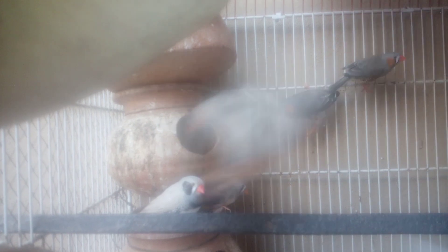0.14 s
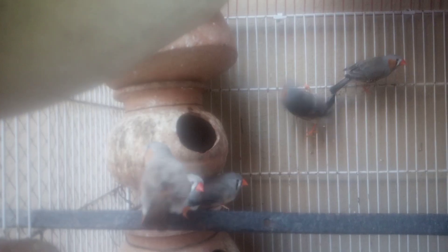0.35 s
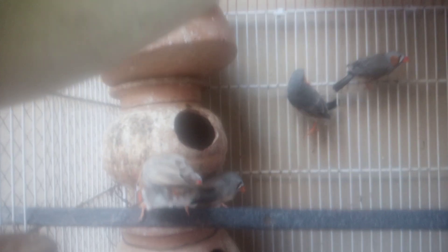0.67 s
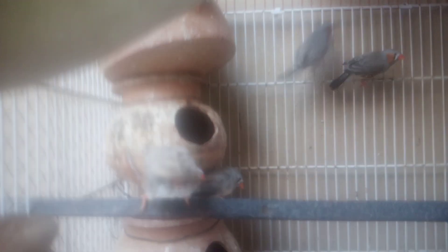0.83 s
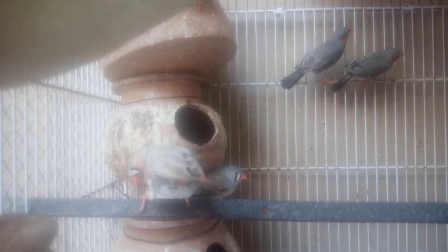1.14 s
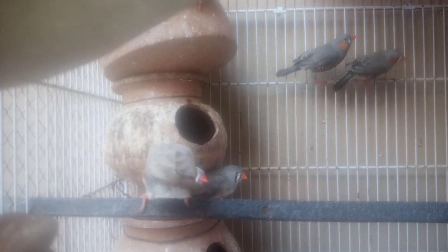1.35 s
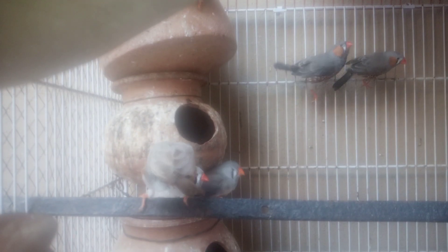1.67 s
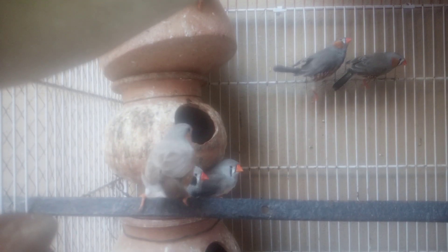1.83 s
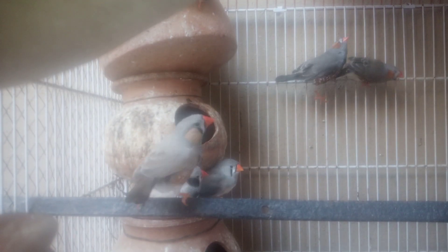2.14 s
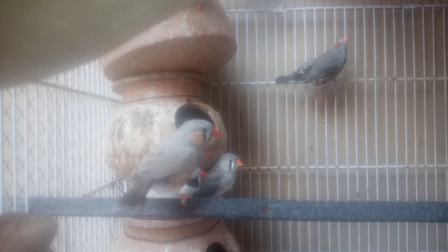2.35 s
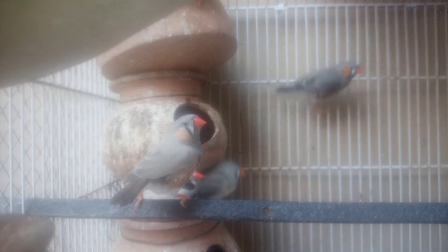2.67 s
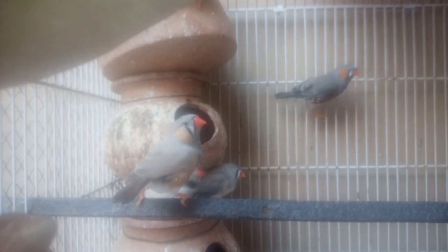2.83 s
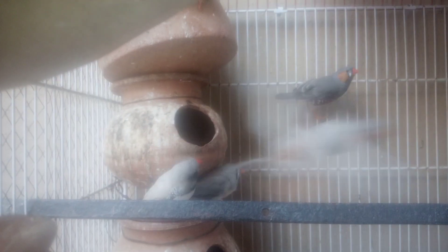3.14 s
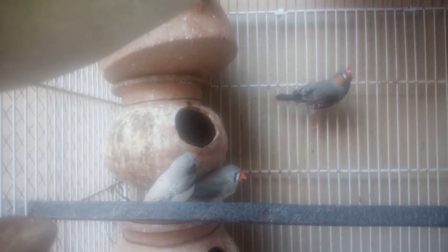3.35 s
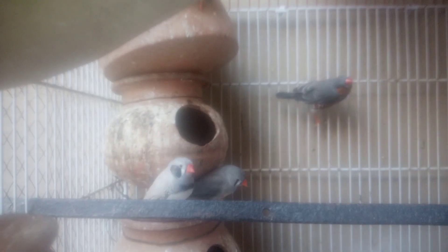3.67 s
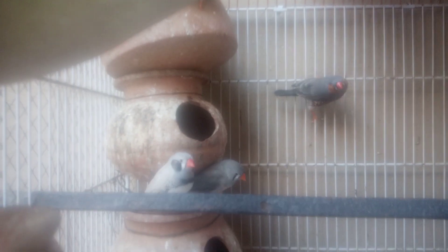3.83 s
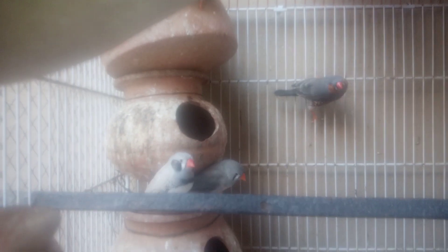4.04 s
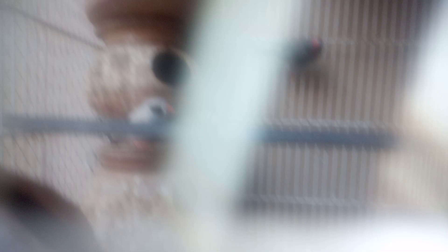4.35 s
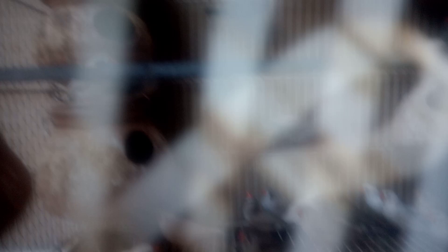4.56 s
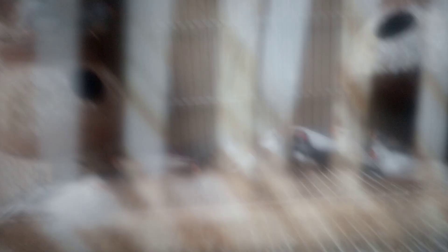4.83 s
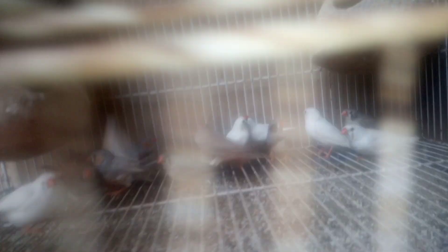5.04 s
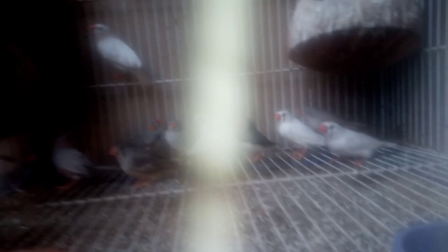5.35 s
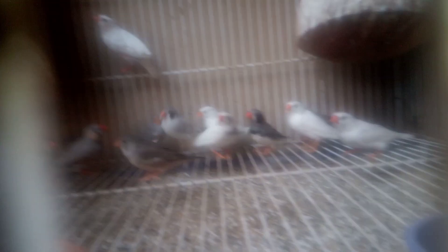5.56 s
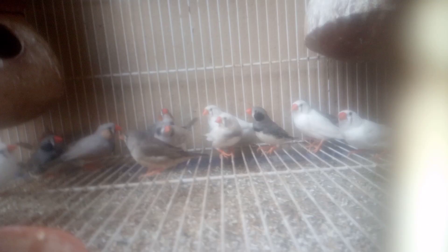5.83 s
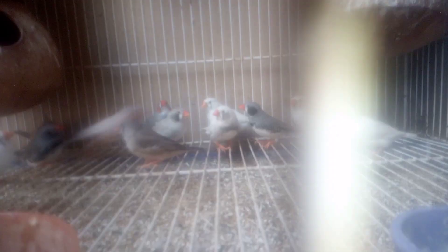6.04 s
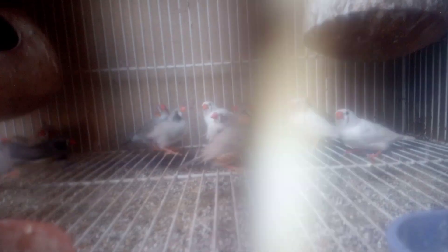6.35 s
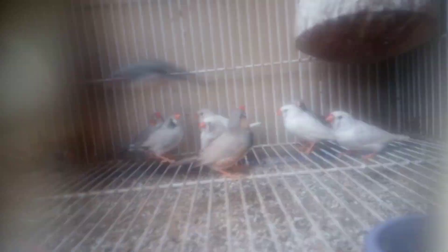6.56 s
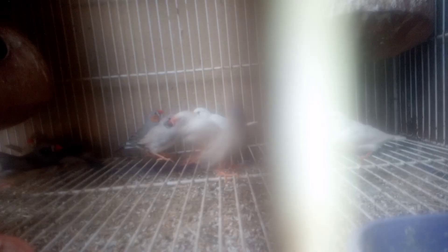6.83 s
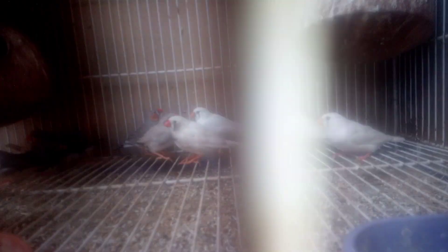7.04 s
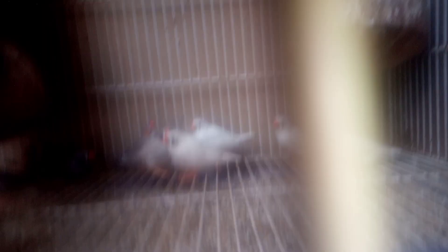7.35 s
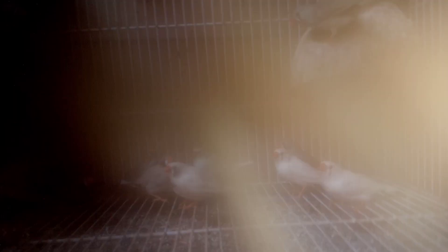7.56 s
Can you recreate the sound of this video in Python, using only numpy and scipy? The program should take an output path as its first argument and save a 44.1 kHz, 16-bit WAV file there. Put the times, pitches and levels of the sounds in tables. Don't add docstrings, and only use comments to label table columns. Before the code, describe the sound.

Overlapping small-bird calls fill a reverberant cage: rough buzzing chirps, quick near-pure whistles sliding up or down, and short toy-like nasal beeps. The densest, loudest clusters come in the first half second and around three and a half seconds; later calls are sparser. Faint metallic ticks, soft feather hiss, far birds and low rumble sit underneath, heard through a muffled phone microphone with air stirring as it moves nearer.

```python
import sys
import numpy as np
from scipy import signal
from scipy.fft import rfft, irfft
from scipy.io import wavfile

SR = 44100
rng = np.random.default_rng(int(sys.argv[2]) if len(sys.argv) > 2 else 0)


def file_out(sig):
    cols = np.atleast_2d(sig).T
    lim = np.clip(cols, -1, 1)
    pcm = np.round(lim * 32767).astype(np.int16)
    wavfile.write(sys.argv[1], SR, pcm)


def magnitude_from_level(level_db):
    exponent = np.asarray(level_db, float) / 20
    return 10 ** exponent


N = 339129


def rms_one(x):
    return x / np.sqrt(np.mean(np.abs(x) ** 2) + 1e-20)


def place(out, at, sound):
    out[at:at + len(sound)] += sound


def soft_ends(size, fade_s):
    i = np.arange(size)
    nearest_end = np.minimum(i, size - i)
    return np.sin(np.pi / 2 * np.clip(nearest_end / (fade_s * SR), 0, 1)) ** 2


def wobble(size, hz, count=1):
    r = np.exp(-16 * np.pi * hz / SR)
    white = rng.standard_normal((2, count, size // 8 + 202))
    slow = signal.lfilter([1], [1, -2 * r, r * r], white)[..., 200:]
    slow = slow / np.sqrt(2 * np.mean(slow ** 2, axis=(0, 2), keepdims=True))
    step, part = np.divmod(np.arange(size) / 8, 1)
    step = step.astype(int)
    real, imaginary = slow[..., step] * (1 - part) + slow[..., step + 1] * part
    return real + 1j * imaginary


def coloured(spectrum, low_hz=10, high_hz=20000):
    hz = np.arange(1, N // 2 + 2) * SR / N
    f, level_db = np.transpose(spectrum)
    gain = magnitude_from_level(np.interp(np.log(hz), np.log(f), level_db, -120, -120))
    inside = (hz > low_hz) * (hz < high_hz)
    return rms_one(irfft(rfft(rng.standard_normal(N)) * gain * inside, N))


def voice(pitch, throat, spread, rough, blur_hz, leak_db, jitter, uneven_db, order=2, count=50):
    size = len(pitch)
    phase = 2 * np.pi * np.cumsum(pitch * (1 + jitter * wobble(size, 44.4)[0].real)) / SR
    lines = min(count, int(15000 / pitch.max()))
    k = np.arange(1, lines + 1)[:, None]
    octaves = np.log2(k * pitch / throat)
    gain = np.exp(-.5 * (octaves / spread) ** order) + magnitude_from_level(leak_db)
    gain = gain * magnitude_from_level(uneven_db * wobble(size, 3.9, lines).real)
    clean = np.sqrt(1 - np.clip(rough, 0, 1) ** 2)
    blur = clean + rough * wobble(size, blur_hz, lines)
    waves = blur.real * np.cos(k * phase) - blur.imag * np.sin(k * phase)
    return rms_one(np.sum(gain * waves, axis=0))


def effort(s, length, peak_db, peak, start_db, end_db):
    at = max(int(s * SR), 0)
    progress = np.arange(min(int(length * SR), N - at)) / (length * SR)
    shape_db = np.interp(progress, [0, np.clip(peak, .01, .99), 1], [start_db, 0, end_db])
    return at, progress, peak_db + shape_db


def along(curve):
    s, pitch_hz, level_db = np.transpose(curve)
    t = np.arange(int(s[0] * SR), int(s[-1] * SR)) / SR
    pitch = np.exp(np.interp(t, s, np.log(pitch_hz)))
    return int(s[0] * SR), pitch, np.interp(t, s, level_db)


def chirps():
    # [t/s, length/s, peak level/dB, throat resonance f/Hz, second-voice pitch f/Hz]
    swelling = [(.04, 0.075, -10.5, 4700, 2636), (.56, 0.095, -14, 4810, 2400), (.185, .13, -13, 4600, 700),
                (3.335, 0.11, -22, 4200, 950), (2.708, 0.1, -14, 4750, 746), (3.43, .15, -15, 4483, 975),
                (3.64, 0.062, -16.5, 4126, 2350), (3.97, 0.14, -19, 4650, 652),
                (5.05, .14, -14.5, 4570, 502.5), (6.26, .035, -29.5, 6750, 1315),
                (6.435, 0.125, -19.5, 4500, 640), (5.7, .1, -17.5, 3615, 696),
                (6.96, .12, -15.5, 4613, 772)]
    held = [(.147, 0.045, -15, 4300, 1056), (.985, 0.08, -22, 4800, 1030), (1.132, 0.07, -24, 4900, 1040),
            (1.55, 0.067, -22, 4560, 2403), (4.725, 0.075, -26, 4100, 1030), (4.87, 0.075, -23, 4080, 795)]
    fading = [(0.0, 0.044, -16, 4760, 1480), (1.63, 0.039, -24, 4240, 2970), (1.95, 0.09, -39, 3800, 1286),
              (2.912, .19, -15.5, 4343, 1100), (3.85, 0.09, -16, 4200, 770)]
    narrow = [(1.35, .15, -14, 4750, 203.4), (2.105, 0.16, -12, 4554, 492), (5.46, .2, -12.5, 4586, 467),
              (5.7, 0.089, -17, 4430, 370), (3.315, .08, -23, 5300, 480), (5.385, .09, -27, 4200, 480),
              (7.615, .075, -31.5, 4610, 486)]
    building = [(3.74, .12, -15, 4200, 491), (5.95, .225, -18, 4490, 866)]
    # (calls, peak at share of length, start dB, end dB, throat glide octaves, throat width octaves,
    # second voice dB)
    kinds = [(swelling, .41, -9.5, -11.5, .03, .37, -9),
             (held, 1, -2, -1.5, .072, .26, 7.1),
             (fading, .11, 1, -10, -.073, .3, -6.5),
             (narrow, .38, -4.5, -11.5, .0805, .12, -25.5),
             (building, .5, -2, -9.5, -.2, .098, -2.5)]
    out = np.zeros(N)
    for calls, peak, start_db, end_db, glide, spread, second_db in kinds:
        for s, length, peak_db, throat_hz, second_hz in calls:
            at, progress, level_db = effort(s, length, peak_db, peak, start_db, end_db)
            throat = throat_hz * 2 ** (glide * (progress - .5))
            beak = .55 + .45 * soft_ends(len(throat), .0307)
            rasp_pitch = throat / 17 * (.92 + .15 * beak)
            rasp = voice(rasp_pitch, throat, spread * beak, rough=min(.75 + 2.3 * spread, .9),
                         blur_hz=52, leak_db=-39, jitter=.06 * spread, uneven_db=13 * spread)
            hoarse_pitch = second_hz * throat / throat_hz * (.9 + .1 * beak)
            hoarse = voice(hoarse_pitch, throat, 1.78 * spread, rough=1, blur_hz=107,
                           leak_db=-32.5, jitter=.025, uneven_db=4.5, count=28)
            call = rms_one(rasp + magnitude_from_level(second_db) * hoarse)
            place(out, at, call * magnitude_from_level(level_db - 6.5) * soft_ends(len(call), .007))
    return out


def background():
    # [f/Hz, level/dB per Hz]
    rumble = [(12, -47), (20, -35.5), (38, -12.5), (61, -12.5), (75, 7.5), (103, -4), (129, 4),
              (163, -10.5), (220, -26.5), (290, -38.5), (480, -120)]
    air = [(110, -32.5), (180, 4), (239, -1), (334, -1), (443, -10), (564, -11.5), (932, -17), (1070, -16),
           (2200, -20.5), (2860, -54.5), (4840, -120)]
    far_birds = [(1060, -51), (1800, -19.5), (2440, -3.5), (2920, 1.5), (3290, -8), (4360, 0.5),
                 (5420, -14), (6430, -23.5), (8360, -56), (14100, -120)]
    # [t/s, stir level/dB]
    stir = [(0, 1), (1, 1), (2.8, 1.9), (4.6, 2.5), (5.2, 7.5), (5.9, 10), (6.3, 5.5), (7.69, 4)]
    t = np.arange(N) / SR
    stir_db = np.interp(t, *np.transpose(stir))
    low_air = magnitude_from_level(-45 + stir_db) * coloured(air, high_hz=500)
    bins = rfft(coloured(air, low_hz=500))
    hz = np.arange(N // 2 + 1) * SR / N
    band = np.floor(np.log2(hz / 500 + 1e-9) * 1.5)
    patches = magnitude_from_level(2.5 * wobble(N, 11, count=4).real)
    high = sum(patch * irfft(bins * (band == k), N) for k, patch in enumerate(patches))
    high_air = magnitude_from_level(-45 + .21 * stir_db - .5049 * t) * rms_one(high)
    murmur_db = -44 - .85 * t + 4 * wobble(N, 7)[0].real
    murmur = magnitude_from_level(murmur_db) * coloured(far_birds)
    return magnitude_from_level(-33) * coloured(rumble) + low_air + high_air + murmur


def whistle(pitch, level_db):
    call = voice(pitch, pitch, .2, rough=.68, blur_hz=95, leak_db=-32, jitter=.011, uneven_db=.5, count=7)
    return call * magnitude_from_level(level_db - 3.5) * soft_ends(len(call), .007)


def whistles():
    # [t/s, length/s, peak level/dB, first pitch f/Hz, last pitch f/Hz]
    struck = [(.03, 0.053, -21.5, 2986, 2640), (.055, 0.09, -15.5, 5250, 5100),
              (.155, 0.028, -17.5, 3224, 3080), (.158, 0.025, -29, 6350, 6200),
              (.2, 0.09, -16.5, 4300, 4330), (.27, 0.068, -25, 3220, 3300), (2.925, 0.03, -21, 3000, 3000),
              (.57, 0.025, -19, 3630, 3920), (.61, 0.059, -17.5, 5050, 5250), (.99, 0.035, -32, 3600, 3500),
              (1.19, 0.054, -20, 4100, 4130), (1.5, 0.036, -34.5, 2860, 2800),
              (1.535, 0.05, -34.5, 2810, 2156), (1.645, 0.03, -34, 3300, 3700),
              (2.135, 0.06, -28, 2900, 2960), (3.858, .03, -24, 2300, 2280), (3.92, .06, -24, 5400, 5330),
              (3.898, .05, -16, 3980, 3960), (.987, .045, -29, 2950, 2930), (4.72, .03, -26, 4150, 4100),
              (3.035, .05, -17, 4200, 4100), (4.92, 0.091, -17, 4300, 4150),
              (5.15, 0.024, -26.5, 4400, 3940), (5.725, 0.041, -21.5, 5170, 5100),
              (6.91, .09, -35.5, 4460, 4020)]
    sliding = [(.905, 0.1, -30.5, 4175, 4220), (3.63, 0.055, -31, 2190, 2574),
               (4.54, 0.15, -39, 4750, 4450), (5.34, 0.037, -39.5, 4560, 4730),
               (5.405, 0.028, -37.5, 1484, 1075), (2.98, .07, -28, 2950, 2650),
               (4.795, .035, -17, 4800, 4050)]
    even = [(.03, .06, -23, 5560, 5520), (.185, .07, -25.5, 2735, 2675), (.272, 0.05, -26, 6550, 6520),
            (.255, .06, -31, 7150, 7100), (1.64, 0.05, -38, 2250, 2100), (1.625, .03, -24, 4350, 4350),
            (5.74, .055, -27, 5180, 5080), (2.105, 0.054, -16.5, 4285, 4340), (2.83, .1, -49, 2095, 2090),
            (2.912, .04, -20.5, 5150, 4500), (2.935, 0.052, -24, 6630, 6550), (3.03, 0.04, -27, 3820, 3846),
            (3.51, 0.047, -18.5, 5610, 6670), (3.545, 0.13, -11, 4350, 3780),
            (3.625, 0.015, -23.5, 4120, 5400), (3.675, 0.04, -17.5, 4000, 5250),
            (3.545, 0.015, -16, 3300, 3300), (3.475, 0.038, -24, 5090, 5250),
            (3.32, 0.019, -42.5, 5220, 6280), (3.855, 0.027, -29, 4620, 6150),
            (5.77, 0.09, -28, 4050, 4180), (7.025, 0.037, -26, 7100, 7020)]
    dropping = [(1.865, .08, -40, 4250, 4000), (5.105, .065, -32, 2550, 2250)]
    # [t/s, pitch f/Hz, level/dB]
    bending = [
        [(3.706, 4650, -14), (3.72, 4450, -11), (3.755, 4000, -13), (3.78, 3720, -14), (3.82, 3780, -15),
         (3.862, 3740, -15)],
        [(1.062, 4900, -30), (1.075, 4500, -26), (1.09, 4200, -22), (1.122, 4150, -28)],
        [(1.065, 3950, -34), (1.1, 3550, -32), (1.115, 3200, -29), (1.135, 3040, -30), (1.2, 3180, -33)],
        [(1.81, 3960, -42), (1.87, 3900, -42), (1.92, 3750, -43), (1.96, 3580, -41)],
        [(.292, 4400, -17), (.312, 4900, -12), (.325, 4300, -15), (.34, 3870, -14), (.37, 3870, -11),
         (.43, 3880, -22)],
        [(6.05, 3950, -34), (6.11, 3200, -28), (6.125, 2550, -28), (6.152, 1950, -34)],
        [(5.955, 3100, -30), (5.97, 2650, -32), (5.995, 2300, -30), (6.022, 2380, -32)],
        [(6.145, 4200, -26), (6.168, 4050, -24), (6.182, 3250, -36), (6.208, 2650, -36)],
        [(5.96, 5400, -21), (5.99, 4750, -20), (6.02, 4650, -19), (6.03, 4300, -20), (6.08, 4330, -15),
         (6.1, 4350, -21)],
        [(2.29, 3800, -38), (2.33, 3100, -33), (2.36, 2720, -28), (2.405, 2700, -37)],
        [(2.385, 4500, -36), (2.44, 4380, -31), (2.5, 4250, -34), (2.52, 3400, -39), (2.55, 2700, -40)],
        [(4.415, 3400, -45), (4.54, 3400, -44), (4.57, 2980, -42), (4.615, 3020, -43)],
        [(4.25, 4500, -38), (4.3, 4510, -35), (4.375, 4480, -39), (4.39, 3950, -42), (4.41, 2700, -43)],
        [(1.35, 4250, -20), (1.39, 4700, -19), (1.44, 5050, -20), (1.49, 5000, -25)],
        [(1.355, 5000, -24), (1.4, 5350, -20), (1.46, 5450, -25)],
    ]
    # (calls, peak at share of length, start dB, end dB, glide power: under 1 early, over 1 late)
    kinds = [(struck, .13, -8, -16, .66), (sliding, .7, -1.5, -13.5, .72),
             (even, .35, -1.5, -2.5, .82), (dropping, .1, -2.5, -.5, 5.1)]
    out = np.zeros(N)
    for calls, peak, start_db, end_db, power in kinds:
        for s, length, peak_db, first_hz, last_hz in calls:
            at, progress, level_db = effort(s, length, peak_db, peak, start_db, end_db)
            pitch = first_hz + (last_hz - first_hz) * progress ** power
            place(out, at, whistle(pitch, level_db))
    for curve in bending:
        at, pitch, level_db = along(curve)
        place(out, at, whistle(pitch, level_db))
    return out


def wings():
    # [t/s, length/s, peak level/dB]
    rustles = [
        (0.708, 0.24, -56),
        (5.832, 0.097, -68),
        (6.5, .3, -65),
    ]
    out = np.zeros(N)
    hiss = coloured([(5000, -18), (8000, -6), (9800, -4), (11500, -19)])
    for s, length, peak_db in rustles:
        at, progress, level_db = effort(s, length, peak_db, peak=.6, start_db=-16, end_db=-14)
        size = len(progress)
        beat = 1 + .4 * np.sin(2 * np.pi * 24 * np.arange(size) / SR)
        place(out, at, hiss[at:at + size] * beat * magnitude_from_level(level_db) * soft_ends(size, .02))
    return out


def ticks():
    # [t/s, peak level/dB, brightness/dB per octave]
    hits = [(0.882, -27, 2), (0.894, -37, 2), (0.96, -38, -5), (2.595, -36, -4.5), (2.624, -33.5, -6),
            (3.872, -48, 5), (3.936, -48, 5), (4.101, -46, 4), (4.302, -44, -4), (4.549, -68, -19.5),
            (4.801, -30, -2.5), (5.703, -37, -4), (5.732, -36, -3), (5.859, -26, -3.5), (5.883, -31, -20),
            (5.916, -30, 0), (6.127, -47.5, 0), (6.163, -46, 1.5), (7.383, -44.5, 0), (7.407, -42, 1.5),
            (2.71, -44, 3), (1.818, -52, 4), (3.775, -52, 5)]
    size = 2048
    out = np.zeros(N + size)
    hz = np.maximum(np.arange(size // 2 + 1) * SR / size, 400)
    dull_top = 1 / (1 + (hz / 11000) ** 4)
    for s, peak_db, tilt_db in hits:
        crack = rng.standard_normal(size) * np.exp(-np.arange(size) / SR / .005)
        tilt = magnitude_from_level(np.clip(tilt_db, -9, 7) * np.log2(hz / 1000))
        crack = irfft(rfft(crack) * tilt * dull_top, size)
        place(out, round(s * SR), crack * magnitude_from_level(peak_db + 7.5))
    return out[:N]


def beep(pitch, level_db, throat_hz, spread, rough):
    call = voice(pitch, throat_hz, spread, rough, blur_hz=70, leak_db=-35, jitter=.0038,
                 uneven_db=3.5, order=4, count=26)
    return call * magnitude_from_level(level_db - 4) * soft_ends(len(call), .005)


def mouth(x):
    cavities = [signal.iirpeak(hz, 11, fs=SR) for hz in (3000, 3650, 4600)]
    return .45 * x + sum(signal.lfilter(*cavity, x) for cavity in cavities)


def beeps():
    # [t/s, length/s, peak level/dB, top pitch f/Hz, throat f/Hz]
    arched = [(1.145, .1, -29, 535, 2900), (3.384, .09, -38, 540, 2700), (3.386, .088, -36, 2160, 2160),
              (4.161, 0.077, -31, 557, 3460), (4.618, 0.085, -36, 560, 3300), (5.674, .06, -31, 710, 3300),
              (5.76, .13, -28, 700, 3500), (6.862, 0.1, -40, 563, 3020), (6.4, 0.07, -35, 612, 2900),
              (7.148, 0.084, -29.5, 533, 3300)]
    # [t/s, length/s, peak level/dB, first pitch f/Hz, last pitch f/Hz]
    squawks = [
        (1.952, .062, -35, 630, 570),
    ]
    # [t/s, pitch f/Hz, level/dB]
    tumbling = [
        [(5.368, 1500, -33), (5.39, 1100, -28), (5.415, 770, -30), (5.45, 540, -31), (5.465, 500, -39),
         (5.52, 430, -36)],
        [(6.562, 1530, -23), (6.583, 1510, -21), (6.59, 1370, -26), (6.605, 1130, -21), (6.62, 930, -23),
         (6.659, 575, -25)],
        [(2.652, 585, -29), (2.67, 520, -31), (2.712, 545, -31)],
    ]
    # [t/s, length/s, peak level/dB, pitch f/Hz]
    honks = [
        (7.443, 0.13, -26, 1825),
        (7.624, 0.093, -30, 2290),
    ]
    out = np.zeros(N)
    for s, length, peak_db, top_hz, throat_hz in arched:
        at, progress, level_db = effort(s, length, peak_db, peak=.61, start_db=-3, end_db=-7.5)
        pitch = top_hz * (1 - .069 * (2 * progress - 1) ** 2)
        place(out, at, beep(pitch, level_db, throat_hz, spread=.54, rough=.45))
    for s, length, peak_db, first_hz, last_hz in squawks:
        at, progress, level_db = effort(s, length, peak_db, peak=.14, start_db=-4, end_db=.5)
        pitch = first_hz * (last_hz / first_hz) ** progress
        place(out, at, beep(pitch, level_db, throat_hz=3300, spread=.6, rough=1))
    for curve, throat_hz in zip(tumbling, [2900, 3500, 3700]):
        at, pitch, level_db = along(curve)
        place(out, at, mouth(beep(pitch, level_db + 2.5, throat_hz, spread=.52, rough=.75)))
    for s, length, peak_db, pitch_hz in honks:
        at, progress, level_db = effort(s, length, peak_db, peak=.066, start_db=0, end_db=-27.5)
        pitch = np.full(len(progress), float(pitch_hz))
        place(out, at, beep(pitch, level_db, throat_hz=4100, spread=.95, rough=.99))
    return out


def room(x):
    t60_s = .65
    t = np.arange(int(t60_s * SR)) / SR
    white = rng.standard_normal(len(t))
    low = signal.sosfilt(signal.butter(4, 5500, fs=SR, output="sos"), white)
    treble = (white - low) * magnitude_from_level(-70 * t / t60_s)
    tail = (low + treble) * magnitude_from_level(-60 * t / t60_s) * (t > .004)
    return signal.fftconvolve(x, tail / np.sqrt(np.sum(tail ** 2)))[:N]


def microphone(x):
    # [f/Hz, gain level/dB]
    response = [(10,2.5),(5200,3.5),(6400,-2),(7200,-13.5),(8500,-19),(11000,-25.5),(13000,-29),(22050,-29.5)]
    f, gain_db = np.transpose(response)
    hz = np.arange(1, N // 2 + 2) * SR / N
    colour = magnitude_from_level(np.interp(np.log(hz), np.log(f), gain_db))
    rounded = .7 * np.tanh(x / .7)
    return irfft(rfft(rounded) * colour, N)


def scene():
    rasping, nasal_and_ticks, thin = chirps(), beeps() + ticks(), whistles()
    echo = room(magnitude_from_level(-5) * rasping + magnitude_from_level(-8.5) * nasal_and_ticks + magnitude_from_level(-4.5) * thin)
    mono = microphone(rasping + nasal_and_ticks + thin + echo) + wings() + background()
    return np.array([mono, mono])


def low_pass(x):
    return signal.sosfilt(signal.butter(12, 15800, fs=SR, output="sos"), x)


def record(dry):
    # [t/s, length/s, depth level/dB, lowest f/Hz, highest f/Hz]
    thinned = [(0.057,0.17,-7,910,2420),(0.204,0.25,-15.5,200,2600),(1.369,0.18,-11.5,1300,4320),(2.097,0.25,-9,920,2970),(3.572,0.264,-19,184,2320),(3.559,0.26,-9.5,30.6,190),(5.491,0.17,-7.5,580,3560),
               (5.49,.19,-20,6100,9000),(1.69,.27,-12,5700,9000),(.09,.07,-20,6500,9000),(2.13,.2,-20,6100,9000),(1.385,.17,-25,6300,9000),(.99,.35,-12,6900,10000)]
    x = dry[0].copy()
    for s, length, depth_db, low_hz, high_hz in thinned:
        part = slice(int(s * SR), int((s + length) * SR))
        band_pass = signal.butter(4, [low_hz, high_hz], "band", fs=SR, output="sos")
        band = signal.sosfiltfilt(band_pass, x[part])
        x[part] -= band * soft_ends(len(band), .038) * (1 - magnitude_from_level(depth_db))
    return low_pass(np.array([x, x]))


dry = scene()
out = record(dry)
file_out(out)
```